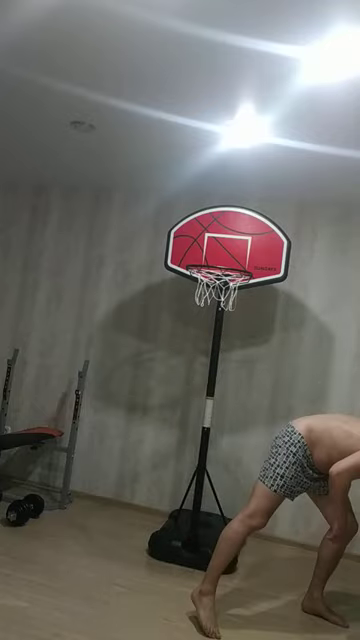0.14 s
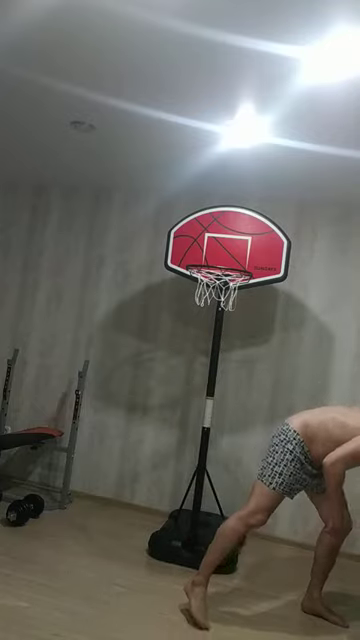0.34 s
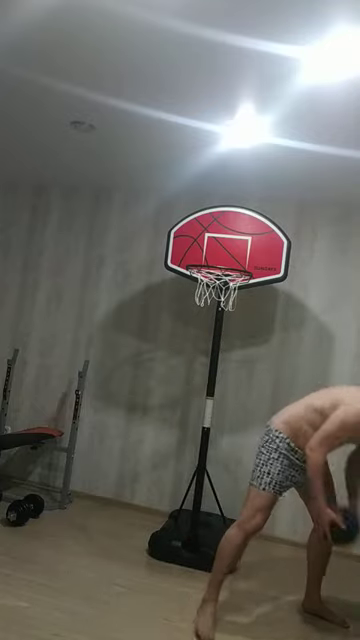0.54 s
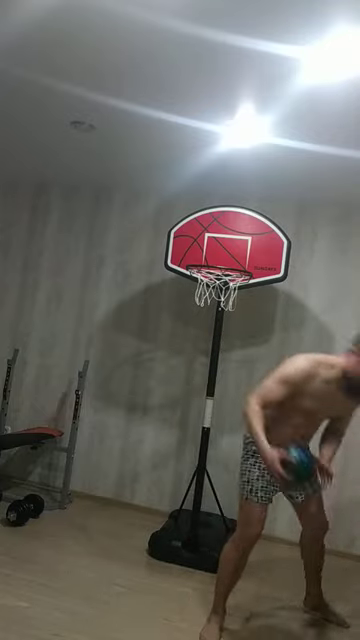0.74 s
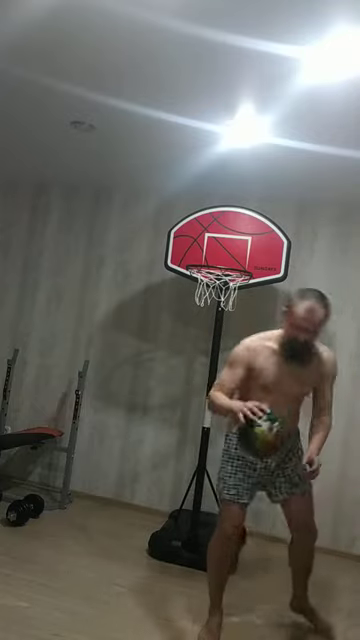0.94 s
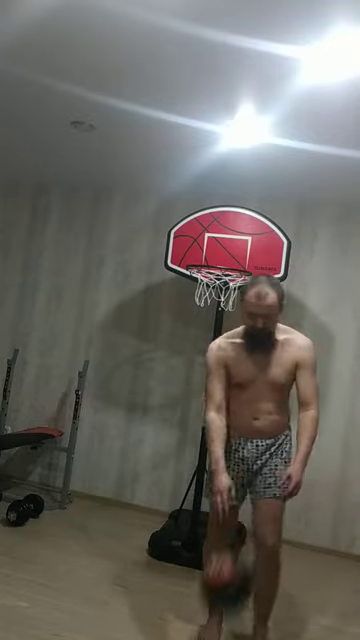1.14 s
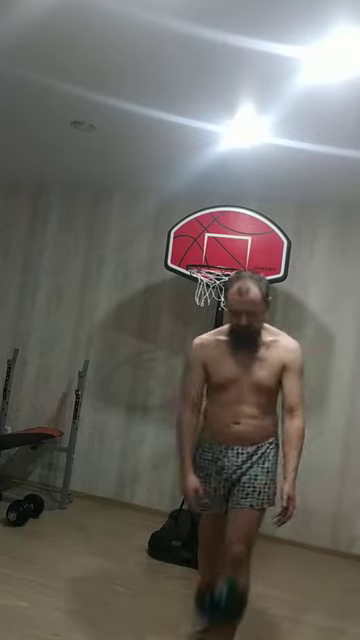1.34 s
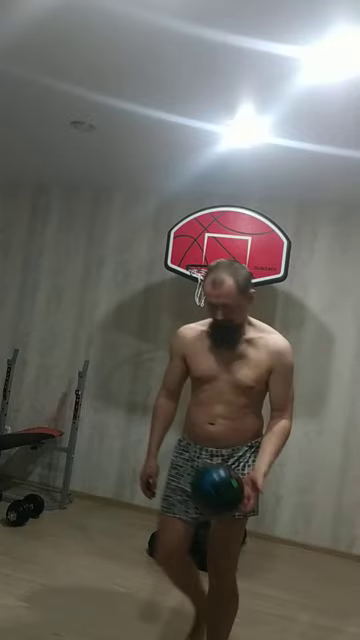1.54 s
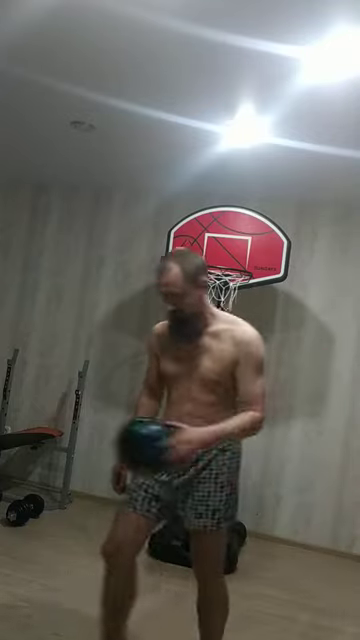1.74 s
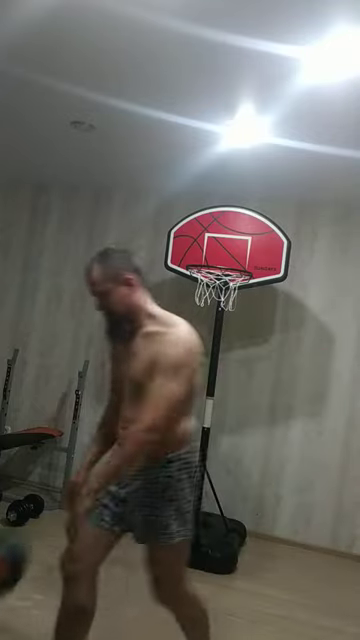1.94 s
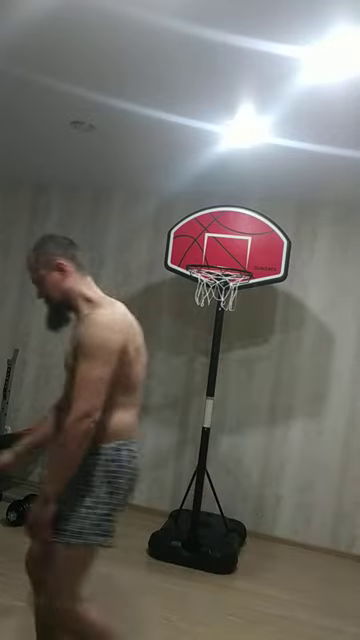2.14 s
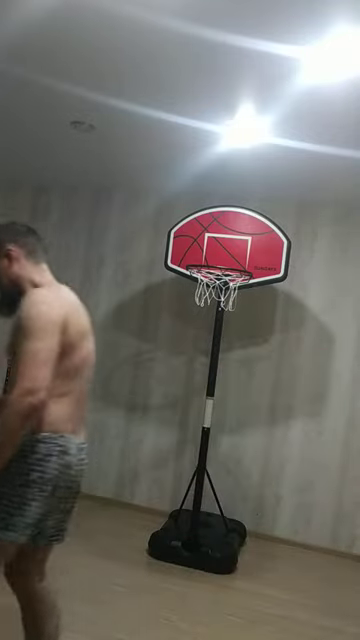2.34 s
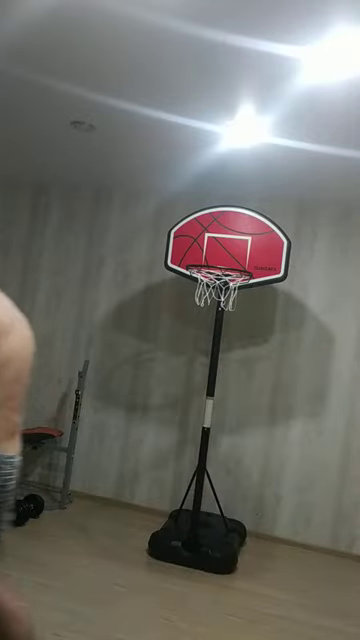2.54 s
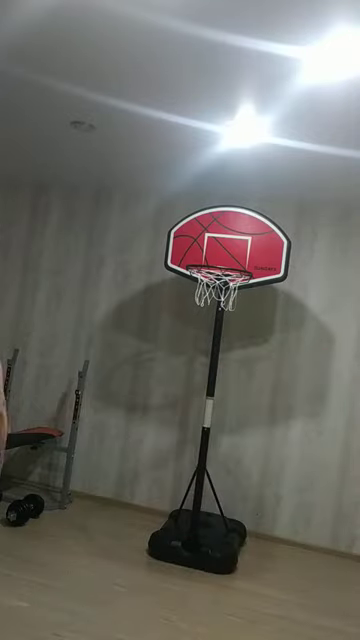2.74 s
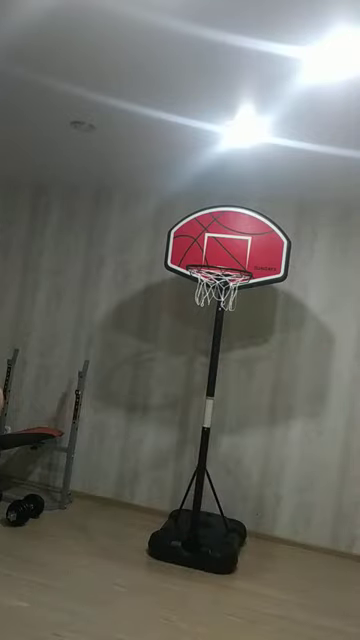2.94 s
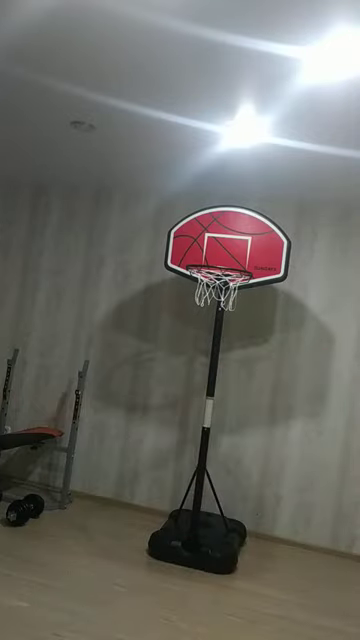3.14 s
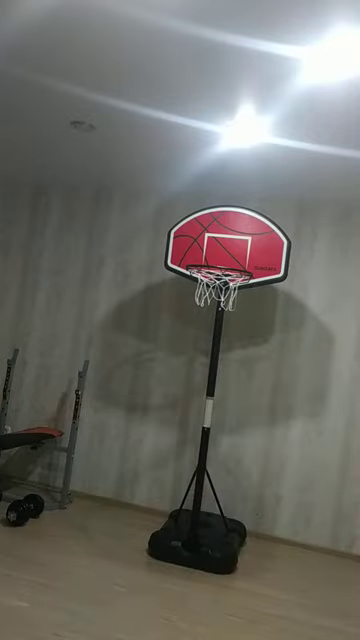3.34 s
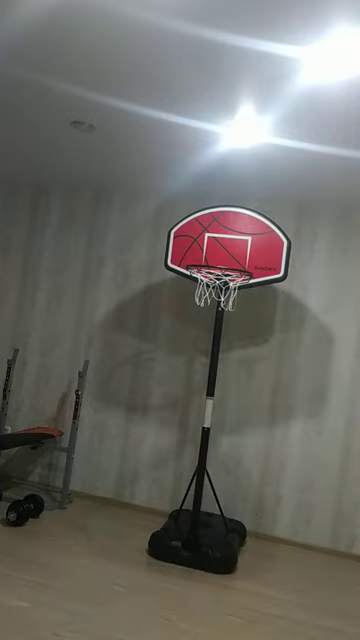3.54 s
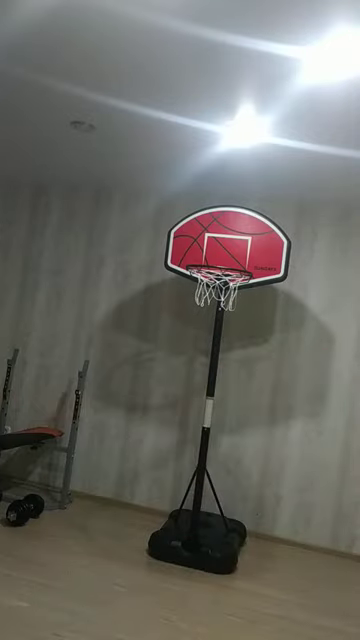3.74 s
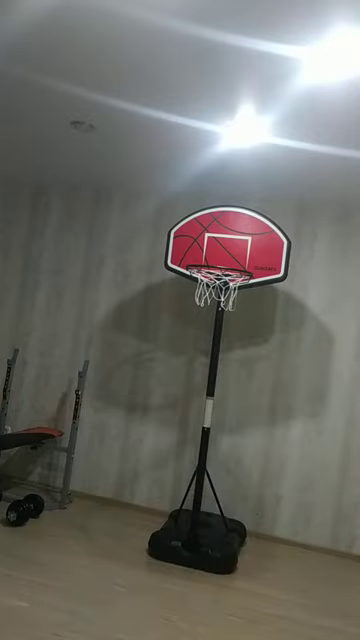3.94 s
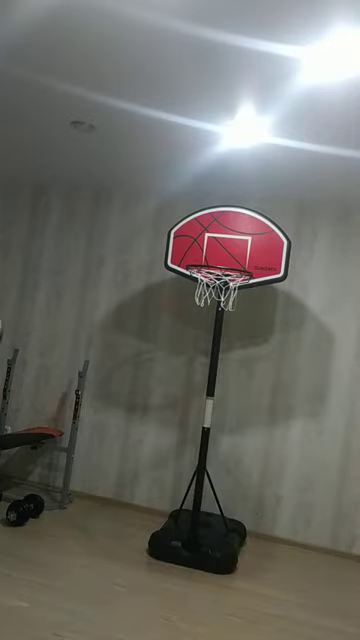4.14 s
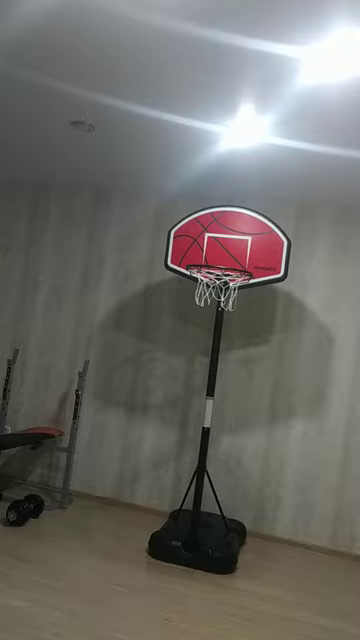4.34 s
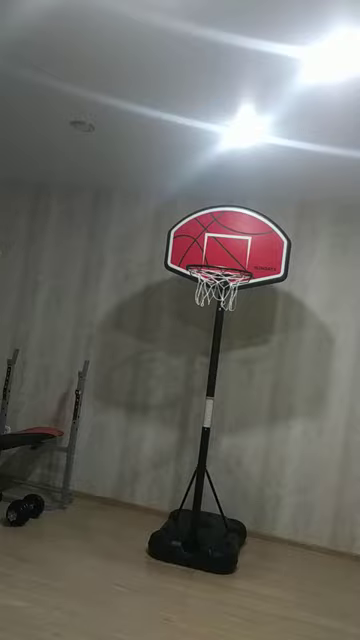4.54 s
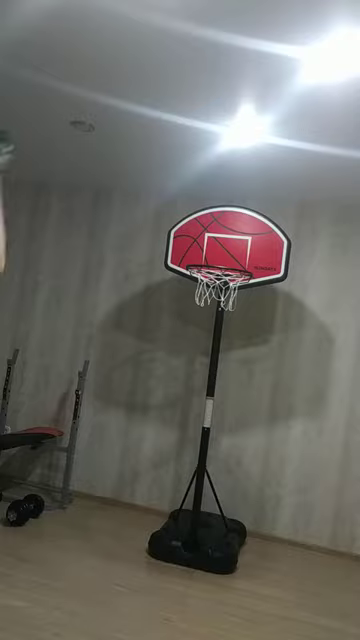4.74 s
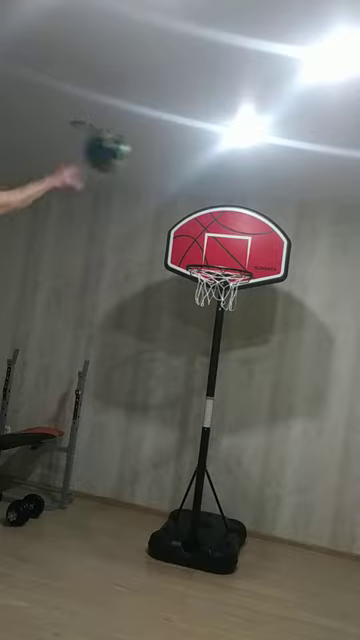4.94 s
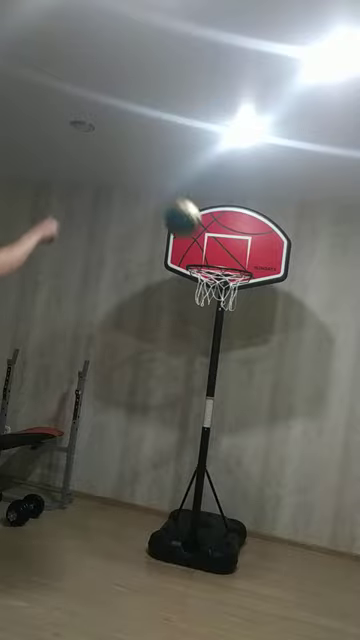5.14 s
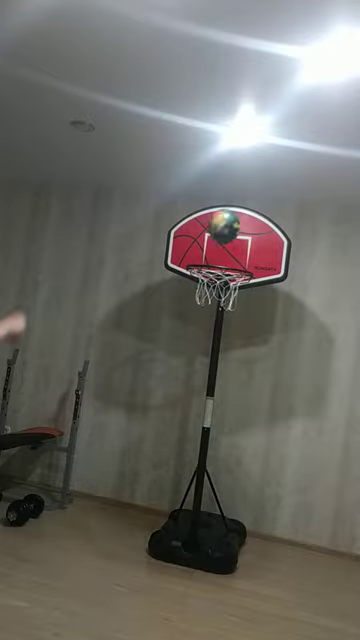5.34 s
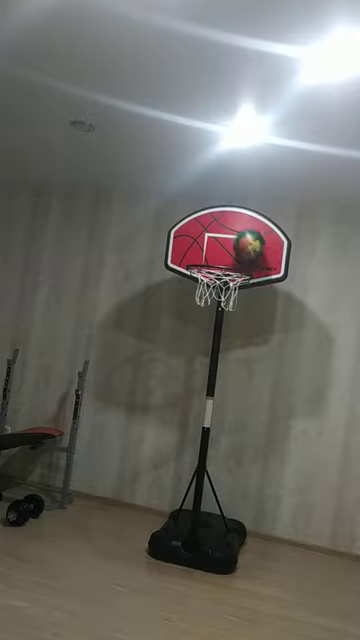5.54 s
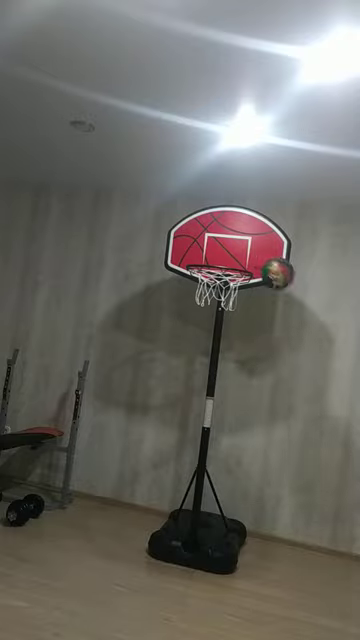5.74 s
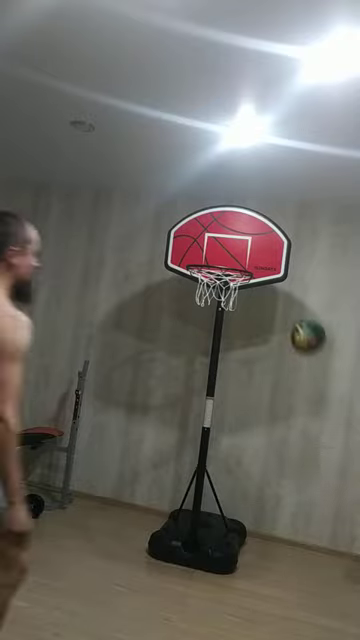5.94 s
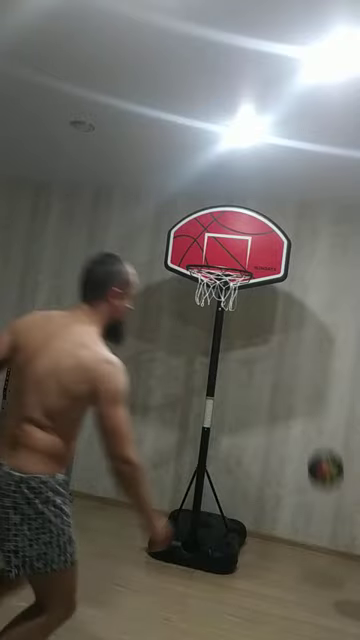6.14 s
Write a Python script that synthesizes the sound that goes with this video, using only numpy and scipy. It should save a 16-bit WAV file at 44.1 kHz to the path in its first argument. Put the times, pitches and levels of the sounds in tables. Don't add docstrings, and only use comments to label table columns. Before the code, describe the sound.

A phone on the spot picks up soft sole shuffles and a muffled thump, then four spaced bounces of a small ball on laminate, booming and twanging with room resonance for about a second each. After nearly two seconds of faint steps comes a dense burst: rim knock, board bang and two loose slaps, duller than the bounces. Brushing feet close it over a low, faint room hum.

```python
import sys
import numpy as np
from scipy import signal
from scipy.fft import rfft, irfft
from scipy.io import wavfile
from scipy.ndimage import uniform_filter1d

SR = 44100
rng = np.random.default_rng(int(sys.argv[2]) if len(sys.argv) > 2 else 0)


def boost_factor(decibels):
    exponent = np.asarray(decibels, float) / 20
    return 10 ** exponent


def inscribe(sig):
    pcm = np.round(np.clip(np.atleast_2d(sig).T, -1, 1) * 32767)
    wavfile.write(sys.argv[1], SR, pcm.astype(np.int16))


N = 276948
TAIL, LEAD = 1 << 15, 64
LEFT_LAG_S, ALIKE_HZ = 0.00033, 770

# (frequency [Hz], left minus right [dB])
PORT_BALANCE = [(60, .5), (300, 0), (700, 3), (1400, -1.5), (2800, -6.5), (5600, -10), (10000, -12.5),
                (15000, -14)]
# (frequency [Hz], density [dB per Hz])
BRUSH_TONE = [(200, -58), (880, -1), (1500, -12.5), (2190, -7.0), (2470, -7.0), (2870, -9.0), (4400, -3.5),
              (4940, -3.5), (10500, -1.5), (13000, -7)][:-1] + [(16000, -10.5)]


def bounces():
    # (time [s], first wall return [ms])
    arrivals = [
        (1.2964, 3.1),
        (2.1260, 4.6),
        (2.6853, 4.8),
        (3.3712, 4.7),
    ]
    # (peak [dB], treble tilt [dB], direct crack [dB], ring level [dB], tail stretch [ratio])
    ball_hits = [
        (-7, 1, -3, 1.5, 0.91),
        (-7, 1.5, -1, 0.5, 0.86),
        (-8.5, 1.5, 0, 1, 0.93),
        (-10, 2, 1.5, 1.5, 0.98),
    ]
    lean_db = [1.2, 0.086, 1.4, 1.15]
    # (frequency [Hz], density [dB per Hz])
    ball_tone = [(76, -38), (130, -22.0), (227, 4.0), (290, 2.5), (446, 4.0), (511, 4.0), (695, -7.5),
                 (983, -11.5), (1060, -15.0), (1360, -9.5), (1620, -14.5), (2210, -14.5), (2680, -17.5),
                 (7020, -22.5), (13000, -26)][:-1] + [(16000, -31.0)]
    # (frequency [Hz], level [dB], T60 [s])
    spot_modes = [
        [(212, -12.5, 0.94), (300, -35, 0.37), (393, -2, 0.48), (420, -8.5, 0.84), (460, -15, 0.86),
         (529, -7, 0.36), (577, -13, 0.55), (958, -5.5, 0.63), (954, -17, 0.59), (1350, -18, 0.61)],
        [(225.5, -9.5, 0.64), (258, 8.5, 0.11), (342, -12.5, 0.72), (381, -21.5, 0.95), (461, -20, 1),
         (511, -17, 1), (560, -33, 0.22), (677, -11, 0.19), (848, -12, 0.48), (1380, -36, 0.55)],
        [(220, -11, 0.81), (347, -18, 0.45), (380, -9.5, 0.47), (513, -15.5, 1), (569, -10.5, 0.46),
         (629, -13.5, 0.18), (674, -1.5, 0.074), (907, -9.5, 0.22), (1350, -37, 1), (1490, -43, 0.92)],
        [(223.4, -9, 0.82), (258, -24, 1.1), (307, -8, 0.59), (440, -13, 0.77), (566, -10, 0.44),
         (738, -8, 0.29), (950, -25, 0.36), (1390, -11.5, 0.62), (1380, -37, .6), (1460, -40, 0.49)],
    ]
    # (frequency [Hz], level [dB], T60 [s])
    floor_modes = [(79.8, -26.5, 0.83), (126, -31, 0.63), (165.6, -25.5, 1.0)]
    mode_sets = [own + floor_modes for own in spot_modes]
    return blows(arrivals, ball_hits, lean_db, [ball_tone] * 4, mode_sets,
                 wash_db=-7.0, ring_db=-8.5, rise_s=0.0031)


def hoop_hits():
    # (time [s], first wall return [ms])
    arrivals = [
        (5.2647, 2.4),
        (5.3160, 4.5),
        (5.361, 4),
        (5.412, 4),
    ]
    # (peak [dB], treble tilt [dB], direct crack [dB], ring level [dB], tail stretch [ratio])
    hits = [
        (-17, 3, -9.5, 0.5, 0.83),
        (-9, .5, -4.5, 0, 0.95),
        (-9.5, -1.5, -3, -2.5, 1),
        (-9.5, -2, -15, -12, 0.47),
    ]
    lean_db = [-0.22, -0.99, -1.1, -1.2]
    # (frequency [Hz], density [dB per Hz])
    rim_tone = [(76, -38), (130, -6.0), (400, 2), (540, 2.0), (720, -15.5), (860, -16.0), (1000, -23.5),
                (2100, -25), (2270, -31), (2830, -32.5), (3460, -36.0), (8850, -37.5), (15500, -34)][:-1]
    # (frequency [Hz], density [dB per Hz])
    board_tone = [(59, -50), (100, -29.0), (211, -15.5), (278, -20.5), (332, -12.0), (366, -14.0),
                  (482, -22.5), (743, -33.5), (837, -31), (1510, -39.0), (2280, -37.0), (3730, -45.5),
                  (5000, -47.5), (6200, -45.0), (7140, -50), (8500, -48.5), (10800, -49.0), (11800, -67),
                  (14300, -55), (22000, -120)][:-1] + [(16000, -75)]
    # (frequency [Hz], level [dB], T60 [s])
    mode_sets = [
        [(520, 0.5, 0.27), (189, -11, 0.79)],
        [(124.8, -20.5, 1.4), (181.5, -12.5, 0.98), (206, -19, 0.97), (234, 1, 0.65), (326, -6.5, 0.51),
         (469.5, -2.5, 0.23), (473, -11, 0.67), (618, -4, 0.29)],
        [(206, -6.5, 0.5), (605, -22, 0.4), (390.4, -0.5, 0.36), (2410, -25, 0.83)],
        [(310, -7, 1), (225, 10, 0.5)],
    ]
    return blows(arrivals, hits, lean_db, [rim_tone] + [board_tone] * 3, mode_sets,
                 wash_db=-6.5, ring_db=-5.5, rise_s=0.002)


def blows(arrivals, events, pans_db, tones, mode_sets, wash_db, ring_db, rise_s):
    mix = np.zeros((2, N))
    for arrival, event, pan_db, tone, modes in zip(arrivals, events, pans_db, tones, mode_sets):
        s, return_ms = arrival
        db, tilt_db, crack_db, own_db, lasting = event
        wash = room(tone, tilt_db, crack_db + 16.5, rise_s, lasting, return_ms, thin_db=-5)
        ringing = boost_factor(ring_db + own_db) * rings(modes, 2 * rise_s)
        add(mix, s, boost_factor(db) * panned(boost_factor(wash_db) * wash + ringing, pan_db))
    return mix


def room(tone, tilt_db, crack_db, rise_s, lasting, return_ms, thin_db=0):
    # (delay [multiple of first return], level [dB])
    first_echoes = [(0, 5), (0.029, -20), (.08, -11), (.97, -2.5), (1.05, -4), (1.641, -3.5), (1.69, -14),
                    (2.15, -8.5), (2.551, -11), (3.3, -7)]
    # (frequency [Hz], T60 [s])
    room_t60 = [(60, 0.074), (160, 0.96), (420, 0.73), (1100, 0.71), (2910, 0.76), (7680, 0.58),
                (14000, 0.33)]
    dense_s, modal_hz, crack_bright_hz = 0.016, 540, 18100
    grit_db, grit_s = -37, 0.00011
    thump_hz, thump_s, thump_db = 364, 0.00082, -16.5

    t = np.arange(TAIL) / SR
    late = np.maximum(t - return_ms / 1200, 0)
    chance = np.clip((late / dense_s) ** 2, .1, 1)
    struck = rng.random((2, TAIL)) < chance
    echoes = rng.standard_normal((2, TAIL)) * struck / np.sqrt(chance)
    echoes *= (1.3 - np.exp(-late / rise_s)) * (t < t[-1500])
    hz, spec = ports(*echoes, PORT_BALANCE)
    spec = spec * boost_factor(thin_db / (1 + (hz / modal_hz) ** 4))

    first = sum(boost_factor(db) * np.exp(-2j * np.pi * hz * k * return_ms / 1000) for k, db in first_echoes)
    crackle = rng.standard_normal(128) * np.exp(-t[:128] / grit_s)
    grit = 1 + boost_factor(grit_db) * rfft(crackle, TAIL) * hz / (hz + 3000)
    shade = boost_factor(along(PORT_BALANCE, hz) * np.array([[1.1], [-.55]]))
    shade = shade * np.exp(-2j * np.pi * hz * np.array([[0], [.0002]]))
    colour = np.minimum(hz / 900, 1) * (1 + hz / crack_bright_hz)
    crack = boost_factor(crack_db) * first * grit * shade * colour
    spec = shaped(spec - crack, hz, tone, tilt_db)

    squeeze = np.sin(2 * np.pi * thump_hz * t) * np.exp(-t / thump_s) * np.array([[1], [.45]])
    squeeze = signal.sosfilt(signal.butter(2, 130, "high", fs=SR, output="sos"), squeeze)
    thump = boost_factor(crack_db + thump_db) * rfft(np.roll(squeeze, 30, axis=1)) * first
    spec = (spec + thump) * np.exp(-2j * np.pi * hz * LEAD / SR)

    bands_hz = 45 * 2 ** (np.arange(18) / 2)
    place = np.clip(2 * np.log2((hz + 1) / bands_hz[0]), 0, len(bands_hz) - 1)
    out = 0
    for k, centre_hz in enumerate(bands_hz):
        band = irfft(spec * np.clip(1 - abs(place - k), 0, 1), TAIL)
        out = out + band * boost_factor(-60 * t / (lasting * along(room_t60, centre_hz)))
    return out * np.clip((np.arange(TAIL) - LEAD / 2) / (LEAD / 2), 0, 1) ** 2


def rings(modes, rise_s):
    waver_db, waver_rad, waver_s = 5, 0.68, 0.0292
    port_waver_rad = 0.25
    crowded_hz = 300
    t = np.maximum(np.arange(TAIL) - LEAD, 0) / SR
    out = 0
    for (hz, db, t60), (phase, shift, apart) in zip(modes, rng.standard_normal((len(modes), 3))):
        left_lag = LEFT_LAG_S * 2 * np.pi * hz + .5 * shift * (hz / ALIKE_HZ) ** 2
        lag = np.array([[left_lag], [0]])
        side_db = along(PORT_BALANCE, hz) * np.array([[.5], [-.5]])
        swell = 1 - np.exp(-t * min(hz, 450) / (rise_s * 450))
        waver = [np.interp(t, np.arange(64) * waver_s, v * min(hz / crowded_hz, 1))
                 for v in rng.standard_normal((2, 64))]
        swell = swell * boost_factor(waver_db * waver[0])
        lag = lag + waver_rad * waver[1]
        lag = lag + port_waver_rad * waver[0][::-1] * np.array([[1], [-1]])
        pair = np.sin(2 * np.pi * hz * t + 2 * phase - lag)
        twin_hz = hz * (1 + 0.0311 * apart)
        pair = pair + min(hz / 1500, .5) * np.sin(2 * np.pi * twin_hz * t + shift - lag)
        out = out + swell * boost_factor(db + side_db - 60 * t / min(t60, 1.2)) * pair
    return out * np.clip((t[-1] - t) / 0.084, 0, 1)


def ports(a, b, balance):
    hz = np.fft.rfftfreq(len(a), 1 / SR)
    alike = np.clip(0.0051 + 1.53 / (1 + (hz / ALIKE_HZ) ** 3), 0, .97)
    left = rfft(a) * np.exp(-2j * np.pi * hz * LEFT_LAG_S)
    right = alike * rfft(a) + np.sqrt(1 - alike ** 2) * rfft(b)
    half = boost_factor(along(balance, hz) / 2)
    return hz, np.array([left * half, right / half]) / np.sqrt((half ** 2 + half ** -2) / 2)


def shaped(spec, hz, tone, tilt_db=0):
    gain = boost_factor(along(tone, hz) + tilt_db * np.log2(np.maximum(hz, 190) / 1000))
    return spec * gain / np.sqrt(np.mean(gain ** 2))


def along(table, hz):
    f, v = np.transpose(table)
    return np.interp(np.log(hz + 1), np.log(f), v)


def panned(x, pan_db):
    return x * boost_factor(np.array([[.5], [-.5]]) * pan_db)


def add(mix, s, sound):
    i = int(s * SR) - LEAD
    mix[:, i:i + sound.shape[1]] += sound[:, :N - i]


def flexing():
    # (time [s], peak [dB], pitch [Hz], T60 [s])
    swings = [(1.2965, -8, 406, .1), (1.2945, -12, 950, 0.053), (1.335, -17.5, 412, 0.27),
              (1.445, -22, 420, 0.1), (2.15, -24, 511, 0.2), (2.128, -20.5, 960, .15),
              (2.13, -23, 697, .15), (2.688, -13, 300, 0.083), (2.69, -20, 710, .1), (3.372, -14, 357, .13),
              (3.405, -27, 441, 0.48), (3.413, -23, 318, 0.07), (3.415, -32, 560, 0.092),
              (5.296, -17.5, 388, 0.083), (5.3755, -6, 300, 0.066), (5.414, -32, 420, 0.037),
              (5.44, -20, 215, .06), (5.46, -30, 634, 0.18), (5.3223, -7.5, 298, 0.049),
              (5.3214, -5, 520, 0.034), (5.336, -13, 232, 0.24), (5.348, -19, 329, 0.26),
              (5.411, -12, 335, 0.13), (5.483, -25, 306, 0.18), (5.55, -25.5, 326, 0.65),
              (5.651, -36, 225, 0.44), (5.691, -31.5, 520, 0.084), (5.74, -42, 530, 0.074),
              (5.776, -30.5, 437, 0.11)]
    mix = np.zeros((2, N))
    for s, db, hz, t60 in swings:
        add(mix, s, panned(flex(hz, db, t60), along(PORT_BALANCE, hz)))
    return mix


def flex(hz, db, t60):
    rise_s = 0.0019
    t = np.maximum((np.arange(TAIL) - LEAD) / SR - np.array([[LEFT_LAG_S], [0]]), 0)
    swing = (1 - np.exp(-t / rise_s)) * boost_factor(db - 60 * t / t60) * np.sin(2 * np.pi * hz * t)
    return signal.sosfilt(signal.butter(2, 110, "high", fs=SR, output="sos"), swing)


def thuds():
    # (time [s], peak [dB], treble tilt [dB], room mode [Hz], mode level [dB])
    knocks = [(0.135, -38, -3.5, 393, -11), (0.606, -27.5, -4.5, 1340, -19), (0.858, -44.5, 3.5, 354, 4),
              (1.083, -45.5, -6, 326, -11), (1.878, -44.5, 1, 442, 1.5), (2.55, -43, -0.5, 270, 0),
              (3.023, -34.5, -4, 485, -16), (4.075, -42, -6, 511, -3), (4.308, -48.5, -1.5, 202, -2),
              (4.604, -50.5, -15, 203.5, 8.5), (4.674, -48.5, -5, 283, -13), (5.69, -28, -4.5, 330, -14),
              (6.112, -38.5, -3.5, 511, 1)]
    # (time [s], peak [dB], treble tilt [dB], room mode [Hz], mode level [dB])
    pads = [(0.029, -42.5, 9, 393, -0.5), (0.198, -54.5, -2, 448.5, 12.5), (0.548, -44, -2, 258, -12),
            (0.7, -35.5, -5, 307, -16), (1.447, -25.5, 2, 440, -24), (1.751, -93, -36, 365, 2),
            (1.965, -47, -1.5, 300, 2), (3.27, -49.5, -1.5, 258, -9), (3.889, -40, -6.5, 511, 0),
            (3.949, -52, -1, 520, 5), (4.519, -52, 1, 203, 8), (4.841, -41, -4.5, 452, -24),
            (4.909, -45, -1, 307, -2), (6.009, -40, 0.5, 326, -20)]
    # (frequency [Hz], density [dB per Hz])
    thud_tone = [(24, -73), (40, -48.5), (358, -4.5), (624, -6), (933, -26), (1330, -13), (1750, -19.5),
                 (2430, -20), (14900, -37.5), (16500, -63)]
    # (time [s], peak [dB], treble tilt [dB], tail stretch [ratio], direct click [dB])
    ticks = [
        (0.608, -60, -11, 0.41, 1.5),
        (1.824, -38, -4, 0.41, -12),
        (4.088, -39, -1, 0.75, -2),
        (4.84, -56, -9, 0.31, 3),
        (4.896, -43.5, -6.5, 0.34, 2),
        (5.648, -30, 0.5, 0.46, -22),
        (6.182, -56, 5, 0.31, 13),
        (6.272, -40.5, -1, 0.39, -2),
    ]
    # (time [s], peak [dB], pitch [Hz], T60 [s])
    snaps = [
        (4.8397, -31.5, 3940, 0.012),
        (6.182, -42, 7200, 0.012),
        (6.182, -49, 10130, 0.008),
    ]
    mix = np.zeros((2, N))
    for contacts, rise_s in [(knocks, 0.0011), (pads, 0.0097)]:
        for s, db, tilt_db, hz, ring_db in contacts:
            wash = room(thud_tone, tilt_db, -40, rise_s, 0.9, 0.28)
            add(mix, s - .004, boost_factor(db - 8.0) * (wash + rings([(hz, ring_db, .5)], rise_s)))
    for s, db, tilt_db, lasting, click_db in ticks:
        tick = room(BRUSH_TONE, tilt_db, click_db, 0.0013, max(lasting, .05), 0.077)
        add(mix, s, boost_factor(db - 8.0) * tick)
    for s, db, hz, t60 in snaps:
        add(mix, s, rings([(hz, db, t60)], 1 / 2000))
    return mix


def brushing():
    # (start [s], length [s], level [dB], fade over
    # length [dB], brightness [dB])
    slides = [(0.0, .33, -53.5, 3, -1.5), (0.507, 0.085, -65.5, -5, 3), (0.611, 0.086, -49, 1, -3.5),
              (0.725, 0.12, -56.5, -2.5, -4), (0.87, 0.21, -59, 12, 6), (1.036, 0.31, -58, 11.5, -2.5),
              (1.833, 0.072, -51.5, 7.5, -6), (1.921, 0.18, -61, -1.5, -7.5),
              (2.522, 0.17, -52.5, 7.5, -4.5), (2.967, 0.07, -55.5, -4, -2), (3.042, 0.094, -52, 4, -3),
              (3.187, 0.057, -62, -1.5, -5), (3.616, 0.12, -58, -2, -5.5), (3.898, 0.11, -59, 11, -6),
              (4.082, 0.12, -57.5, 15, -8), (4.27, 0.35, -68.5, 7, -10.5), (4.837, 0.093, -64, 3, -13),
              (4.992, .05, -70.5, 6, -15), (5.671, 0.029, -43.5, 5.5, 2), (5.71, 0.02, -54, -1, 4),
              (5.741, 0.24, -46.5, 36, 0.5), (5.958, 0.28, -53, 9, -5), (6.195, 0.079, -62, 3, -2)]
    grip_db_per_s, lift_db_per_s = 902, 287
    stutter_db, stutter_s = 1, 0.013
    grains = rng.standard_normal((2, N)) * boost_factor(0.54 * rng.exponential(size=(2, N)))
    hz, spec = ports(*(grains / grains.std()), PORT_BALANCE)
    spec = shaped(spec, hz, BRUSH_TONE)
    low = 1 / (1 + (hz / 5500) ** 4)
    dark, bright = irfft(spec * low, N), irfft(spec * (1 - low), N)

    t, power = np.arange(N) / SR, np.zeros((2, N))
    for s, length_s, db, fade_db, tilt_db in slides:
        now = slice(max(int((s - .1) * SR), 0), int((s + length_s + .25) * SR))
        since = t[now] - s
        course_db = db - fade_db * np.clip(since / length_s, 0, 1)
        course_db += grip_db_per_s * np.minimum(since, 0)
        course_db -= lift_db_per_s * np.maximum(since - length_s, 0)
        power[:, now] += boost_factor(2 * (course_db + 4.0 + np.array([[-tilt_db], [tilt_db / 2]])))
    gain = uniform_filter1d(np.sqrt(power), size=441)
    knots_s = np.arange(N // 400) * stutter_s
    stutter = [np.interp(t, knots_s, v) for v in rng.standard_normal((2, len(knots_s)))]
    gain = gain * boost_factor([stutter_db * v for v in stutter])
    return dark * gain[0] + bright * gain[1]


def walker():
    # (time [s], left minus right [dB])
    path = [(0, -3.5), (.7, -2.5), (1.7, -6.5), (2.5, -3), (3.1, -5), (3.8, -5), (4.6, -0.5), (5.7, -5),
            (6.2, -2.5)]
    return panned(thuds() + brushing(), np.interp(np.arange(N) / SR, *np.transpose(path)))


def hush():
    # (frequency [Hz], density [dB per Hz])
    hush_tone = [(15, -56), (25, -27), (60, -26), (103, -25), (226, 0.5), (470, -9), (510, -5.5),
                 (600, -12), (1030, -14), (1390, -17.5), (2270, -18.5), (3060, -21), (3700, -19),
                 (4360, -21), (15200, -20.5), (16500, -21)]
    # (frequency [Hz], left minus right [dB])
    hush_balance = [(60, -3), (110, 5), (200, -1.5), (380, 0), (700, -2.5), (1290, -2.5), (2380, -3),
                    (4400, -3.5), (8120, -4.5), (15000, 0)]
    hz, spec = ports(*rng.standard_normal((2, N)), hush_balance)
    spec = shaped(spec, hz, hush_tone)
    low = 1 / (1 + (hz / 800) ** 4)
    hum, hiss = irfft(spec * low, N), irfft(spec * (1 - low), N)
    sway = np.repeat(rng.standard_normal(N // 4000 + 1), 4000)[:N]
    sway_db = 2 * uniform_filter1d(sway, size=4000)
    return boost_factor(-54.5) * (hum * boost_factor(sway_db) + hiss)


def scene():
    return bounces() + hoop_hits() + flexing() + walker() + hush()


def starved(x):
    starve_hz, starve_db, starve_db_per_khz = 12800, -70, 9
    hz, _, spec = signal.stft(x, SR, nperseg=2048)
    hz = hz[:, None]
    power = uniform_filter1d(np.mean(abs(spec) ** 2, axis=0), size=3, axis=1)
    local = uniform_filter1d(power, size=31, axis=0) / (power.sum(axis=0) + 1e-18)
    limit = boost_factor(2 * (starve_db + starve_db_per_khz * (hz - starve_hz) / 1000))
    lost = np.cumsum((local < limit) & (hz > starve_hz), axis=0) > 0
    return signal.istft(spec * ~lost, SR, nperseg=2048)[1][:, :N]


def band_limit(x):
    return signal.sosfilt(signal.butter(12, 17040, fs=SR, output="sos"), x)


def record(dry):
    mic_low_hz, top_hz = 92, 15650
    heard = signal.sosfilt(signal.butter(1, mic_low_hz, "high", fs=SR, output="sos"), dry)
    rounded = np.tanh(1.056 * heard) / 1.315
    top = signal.ellip(8, .2, 45, top_hz, fs=SR, output="sos")
    return band_limit(starved(signal.sosfilt(top, rounded)))


dry = scene()
out = record(dry)
inscribe(out)
```